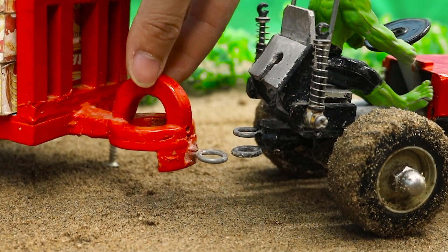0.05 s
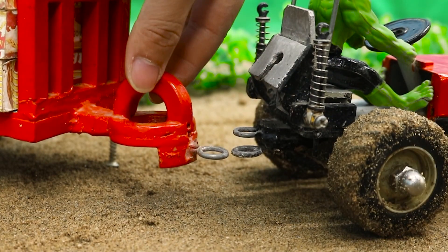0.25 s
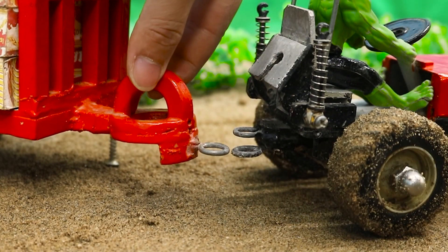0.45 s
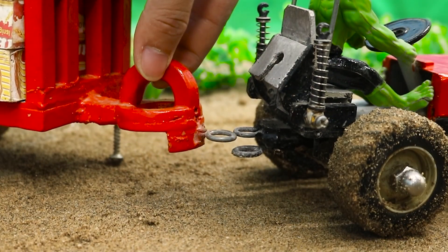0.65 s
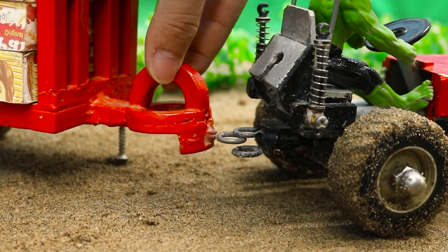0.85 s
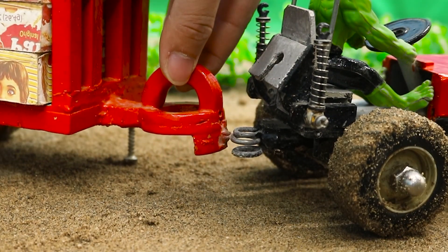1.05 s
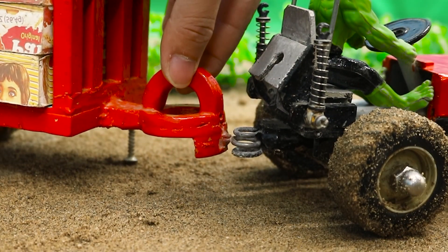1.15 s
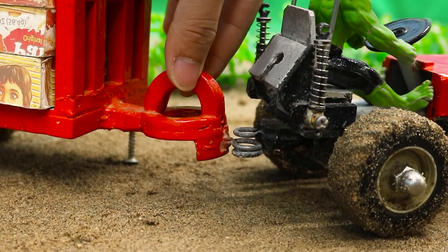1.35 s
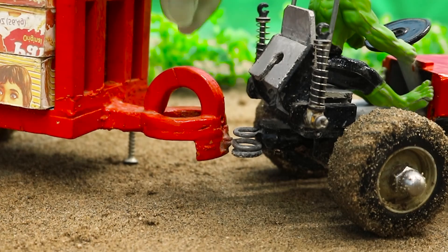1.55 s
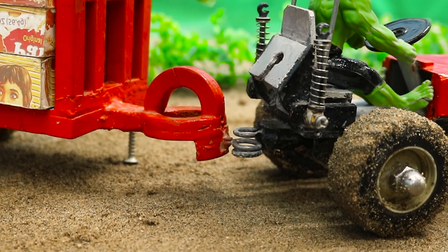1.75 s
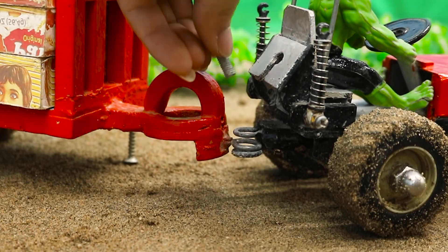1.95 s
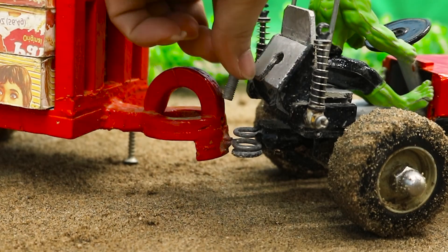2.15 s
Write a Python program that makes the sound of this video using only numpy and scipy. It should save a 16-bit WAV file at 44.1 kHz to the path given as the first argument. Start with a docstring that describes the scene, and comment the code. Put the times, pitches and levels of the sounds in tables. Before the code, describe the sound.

A toy trailer hitch knocks and scrapes onto a toy tractor, with faint birds behind.

```python
"""Small birds whistle and trill far off, over a steady low rumble and hum.
At 0.26 s comes one dull bump close to the microphone.
From 1 s a toy trailer's hitch is pushed onto a toy tractor's coupling: it touches, knocks home,
scrapes and settles. Each contact rings the frames and jingles a metal eyelet."""
import sys
import numpy as np
from scipy import signal
from scipy.fft import rfft, irfft, next_fast_len
from scipy.io import wavfile
from scipy.ndimage import map_coordinates

SR = 44100
rng = np.random.default_rng(int(sys.argv[2]) if len(sys.argv) > 2 else 0)


def bounce(signal):
    """Save signal as a 16-bit WAV file at the path given by the first command-line argument."""
    frames = np.transpose(np.atleast_2d(signal))
    limited = np.clip(frames, -1, 1)
    pcm = np.round(limited * 32767).astype(np.int16)
    wavfile.write(sys.argv[1], SR, pcm)


N = 97020


def amp(db):
    return 10 ** (np.asarray(db) / 20)


def unit(x):
    return x / np.sqrt(np.mean(x ** 2) + 1e-20)


def clock(start_s=0):
    """Seconds since start_s, per sample."""
    return np.arange(N) / SR - start_s


def along(points, hz):
    """Interpolate (Hz, value) points on a log frequency axis."""
    knots_hz, values = np.transpose(points)
    return np.interp(np.log(hz + 1), np.log(knots_hz + 1), values)


def pan(db):
    """Left and right gains; positive is left."""
    return amp(np.array([[db], [-db]]) / 2)


def wobble(knots_per_s):
    """Smooth random curve."""
    return map_coordinates(rng.standard_normal(N // 8), [clock() * knots_per_s], mode="wrap")


def filtered(x, response):
    """Apply the gain response(hz)."""
    size = next_fast_len(N + SR // 2)
    return irfft(rfft(x, size) * response(np.fft.rfftfreq(size, 1 / SR)), size)[..., :N]


def noise(spectrum, tilt_db_oct=0):
    """Coloured noise of rms 1, tilted above about 500 Hz."""
    white = rng.standard_normal(N)
    return unit(filtered(white, lambda hz: amp(along(spectrum, hz) + tilt_db_oct * np.log2(1 + hz / 500))))


def dying(x, t60s):
    """Decay each frequency of x at its own rate."""
    hz, t, bins = signal.stft(x, SR, nperseg=256)
    decay = amp(-60 * t / along(t60s, hz)[:, None])
    return signal.istft(bins * decay, SR, nperseg=256)[1][..., :N]


def fade(start_s, t60_s):
    """Sudden start, exponential decay."""
    t = clock(start_s)
    return (t >= 0) * amp(-60 * abs(t) / t60_s)


def swell(peak_s, rise_s, fall_s):
    """Gaussian rise and fall."""
    t = clock(peak_s)
    return np.exp(-(t / np.where(t < 0, rise_s, fall_s)) ** 2 / 2)


def sine(hz, start_s=0, phase_rad=0):
    return np.sin(2 * np.pi * hz * clock(start_s) + phase_rad)


def ring(modes, start_s, scatter_db):
    """Damped modes of alternating sign, struck a little differently each time."""
    return sum(-(-1) ** k * amp(db + scatter_db * rng.normal()) * fade(start_s, t60_s) * sine(hz, start_s)
               for k, (hz, db, t60_s) in enumerate(modes))


def echo(x, t60s):
    """Convolve with a diffuse tail of energy 1."""
    tail = dying(rng.standard_normal(N), t60s)
    return signal.fftconvolve(x, tail / np.linalg.norm(tail))[:N]


def rumble():
    """Low rumble and faint hiss, wider in the treble."""
    # Each row: frequency in Hz, relative density in dB.
    spectrum = [(12, -54), (20, -48), (40, -2), (64, -3.5), (87, -8), (126, -7.5), (148, -20.5),
                (175, -14.5), (306, -27), (427, -33), (597, -34), (1340, -44.5), (2150, -46.5),
                (3080, -50.5), (4070, -49), (4810, -54), (12000, -67), (13500, -81), (15500, -88)]
    # Each row: frequency in Hz, left-right correlation.
    correlation = [(60, 1), (180, 0.93), (550, 0.71), (1650, 0.6), (4970, -0.06), (15000, 0.36)]
    # Each row: frequency in Hz, left over right in dB.
    balance = [(60, -1.9), (180, -1.2), (550, 1.8), (1650, -1.5), (4970, 0.67), (15000, -0.5)]

    def mid_side_gains(hz):
        angle = np.arccos(along(correlation, hz)) / 2
        return np.array([np.cos(angle), np.sin(angle)])

    mid, side = filtered(np.array([noise(spectrum), noise(spectrum)]), mid_side_gains)
    air = np.array([mid + side, mid - side])
    air = filtered(air, lambda hz: amp(np.outer([.5, -.5], along(balance, hz))))
    return amp(-38.5) * unit(air)


def hum():
    """Low tones wavering in level and phase."""
    # Each row: frequency in Hz, rms level in dB.
    lines = [(59.2, -39), (118.4, -51.5), (260, -58), (303, -60), (465, -68), (605, -68)]
    waver_db, drift_rad = 1, 0.81
    tones = sum(amp(db + waver_db * wobble(8.04)) * sine(hz, phase_rad=drift_rad * wobble(8.09))
                for hz, db in lines)
    return np.sqrt(2) * tones * pan(1.5)


def whistles():
    """Short gliding bird notes, first on the right, the last few on the left."""
    # Each row: start in s, length in s, start and end of the glide in Hz, level in dB, pan in dB,
    # roughness as a share of the pitch.
    notes = [(-.03, 0.11, 1900, 1990, -54.5, -3, 0.0016), (0.019, .06, 3560, 3500, -66, -15, 0.0089),
             (0.11, 0.054, 3200, 2620, -66.5, -15, 0.031), (0.196, 0.051, 1907, 1930, -62, -10, 0.0036),
             (0.27, 0.037, 1870, 1837, -57.5, -10, .004), (0.295, 0.024, 3400, 2870, -60, -12, .015),
             (0.318, 0.033, 2710, 2500, -61, -16.5, 0.014), (0.323, 0.028, 4020, 3900, -67.5, -10, 0.021),
             (0.39, 0.018, 3250, 3570, -68.5, -4, .02), (0.404, 0.046, 2100, 2240, -65.5, -14, .015),
             (0.439, 0.089, 2560, 2430, -65.5, -7, 0.01), (0.536, 0.085, 2033, 1951, -64.5, -15, 0.0018),
             (0.662, 0.056, 3594, 3522, -62.5, -17.5, 0.0066),
             (0.78, 0.058, 3286, 3474, -55, -12.5, 0.0052), (0.812, 0.022, 2810, 2680, -61.5, -10, 0.027),
             (0.831, 0.037, 2160, 2235, -61, -18, 0.0099), (0.876, 0.064, 2850, 2890, -66.5, -11, 0.014),
             (0.963, 0.056, 3350, 3090, -61, -11, 0.039), (1.569, 0.021, 2650, 2960, -67, 15, 0.033),
             (1.769, 0.034, 2710, 2670, -67.5, 14, 0.067), (1.95, 0.027, 2580, 2800, -65.5, 17, 0.055)]
    sag_hz = 39.9
    out = np.zeros((2, N))
    for start_s, length_s, from_hz, to_hz, db, pan_db, roughness in notes:
        progress = np.clip(clock(start_s) / length_s, 0, 1)
        arch = abs(np.sin(np.pi * progress))
        hz = from_hz + (to_hz - from_hz) * progress - sag_hz * (arch - .5)
        hz *= 1 + roughness * wobble(400)
        out += amp(db) * arch * np.sin(2 * np.pi * np.cumsum(hz) / SR) * pan(pan_db)
    return out


def rubs():
    """Soft rubbing around the bump."""
    # Each row: frequency in Hz, relative density in dB.
    spectrum = [(100, -3), (400, -2), (1000, -4.5), (2500, -16.5), (5000, -25), (11000, -33.5),
                (16000, -48)]
    # Each row: peak time in s, rise in s, fall in s, level in dB, tilt in dB per octave.
    strokes = [(0.2342, 0.0011, 0.024, -39, -1.5), (0.272, 0.027, 0.017, -50, 1),
               (0.28, 0.033, 0.021, -52, 4.5)]
    out = np.zeros((2, N))
    for peak_s, rise_s, fall_s, db, tilt in strokes:
        friction = np.array([noise(spectrum, tilt), noise(spectrum, tilt)])
        out += amp(db) * swell(peak_s, rise_s, fall_s) * friction
    return out


def air_push():
    """The bump's push of air and its rebound."""
    # Each row: centre in s, width in s, level in dB.
    pulses = [(0.2518, 0.0047, -13), (0.279, 0.014, -21.5)]
    out = np.zeros(N)
    for centre_s, width_s, db in pulses:
        u = clock(centre_s) / width_s
        out += amp(db) * (1 - u * u) * np.exp(-u * u / 2)
    return out


def microphone_rock(start_s):
    """The bump rocks the microphone, its two sides in opposition."""
    # Each row: frequency in Hz, level in dB, t60 in s.
    modes = [(30, -19, 0.21), (86, -13.5, 0.11)]
    rock = sum(amp(db) * fade(start_s, t60_s) * sine(hz, start_s) for hz, db, t60_s in modes)
    return np.array([-rock, rock])


def knock(start_s):
    """The bump's dull knock: damped modes, a brief crack and a low thud."""
    # Each row: frequency in Hz, relative level in dB, t60 in s.
    modes = [(131, -12, .07), (230.3, 0, 0.12), (371, -9, 0.098), (655, -14, 0.062), (772, -10.5, 0.06),
             (920, -21, 0.04), (1140, -10.5, 0.046), (1270, -24, 0.087)]
    # Each row of both: frequency in Hz, relative density in dB.
    crack_spectrum = [(100, 12), (500, 10), (1200, -24), (2500, -4.5), (5000, -17.5), (12000, -25),
                      (16000, -38)]
    thud_spectrum = [(15, -10), (35, 11), (70, 0), (140, 0.5), (300, -6), (700, -33), (2000, -52),
                     (8000, -62)]
    rise_s, fall_s = 0.017, 0.023
    body = amp(-19) * ring(modes, start_s, scatter_db=1)
    crack = amp(-24.5) * fade(start_s, t60_s=0.033) * noise(crack_spectrum)
    t = clock(start_s)
    envelope = np.exp(-abs(t) / np.where(t < 0, rise_s, fall_s))
    thud = amp(-24) * envelope * np.array([noise(thud_spectrum), noise(thud_spectrum)])
    return (body + crack) * pan(0.5) + thud


def pressure_dips():
    """Sharp pressure dips of the knock and its rebound."""
    # Each row: time in s, level in dB.
    dips = [(0.2578, -8.5), (.2645, -25)]
    width_s, tip_round_s = 0.00039, 0.00005
    pulses = sum(amp(db) * np.exp(-np.hypot(clock(at_s), tip_round_s) / width_s) for at_s, db in dips)
    return -pulses * pan(0.5)


def trills():
    """Bird notes on the left, mostly rising, warbling fast in pitch and level."""
    # Each row: start in s, length in s, pitch in Hz, rise in Hz per s, level in dB, relative warble.
    notes = [(0.505, 0.079, 3950, 0, -74, 0.54), (0.676, 0.13, 4120, 297, -68, .5),
             (0.87, 0.11, 4050, 191, -68, 0.68), (1.434, 0.12, 4040, 203.5, -68.5, .4),
             (1.628, .108, 4140, 1503, -66, 0.96), (1.814, 0.12, 4020, 1604, -62.5, 0.86),
             (2, .093, 4000, 3410, -60.5, 0.96)]
    warble_hz, swing_hz = 65.4, 145
    out = np.zeros(N)
    for start_s, length_s, pitch_hz, rise_hz_s, db, warble in notes:
        t = np.clip(clock(start_s), 0, length_s)
        beat = 2 * np.pi * warble_hz * t
        swing = warble * np.sin(beat) + 0.34 * wobble(280)
        hz = pitch_hz + rise_hz_s * (t - length_s / 2) + swing_hz * swing
        arch = abs(np.sin(np.pi * t / length_s)) ** .5
        tremolo = 1 - 0.8 * warble * np.cos(beat)
        out += amp(db) * arch * tremolo * np.sin(2 * np.pi * np.cumsum(hz) / SR)
    return out * pan(14.5)


def birds():
    """Distant whistles and trills with a short echo."""
    # Each row: frequency in Hz, t60 in s.
    echo_t60s = [(2000, 0.26), (5000, 0.073)]
    song = whistles() + trills()
    return song + amp(-7) * np.array([echo(side, echo_t60s) for side in song])


def frame_ring(start_s):
    """The struck toy frames ring in their modes."""
    # Each row: frequency in Hz, relative level in dB, t60 in s.
    modes = [(167.4, -3, 1.82), (220.5, -11.5, 1.56), (288, -4.5, 1), (326.6, -9, 0.94), (401, -6, 0.25),
             (433, -0.5, 0.31), (490, -11, 0.45), (534, 0, 0.52), (604, -2.5, 0.5), (750, -7, 0.6),
             (769, -14, 0.67), (970, -24, 0.45), (1134, -16, 0.76), (1258, -10.5, 1.03), (1490, -0.5, 0.35),
             (1760, 2, 0.32), (1803, -6.5, 0.3), (1917, -9, 0.81), (2305, -11, 0.41), (2614, -9, 0.29),
             (2950, -17, 0.41)]
    attack_s = 0.004
    onset = 1 - np.exp(-abs(clock(start_s)) / attack_s)
    return amp(-6.5) * onset * ring(modes, start_s, scatter_db=2)


def eyelet_jingle(start_s):
    """The metal eyelet's modes, blurred by its rattling."""
    # Each row: frequency in Hz, relative level in dB, t60 in s.
    modes = [(3560, -8, 0.11), (5440, -12, 0.17), (7180, 2.5, 0.15), (8020, -2, 0.26), (8770, -7, .2),
             (9020, -7, .18), (11100, -15, .14)]
    blur_rad, rattle_per_s = 1.2, 410
    return sum(amp(db) * fade(start_s, t60_s) * sine(hz, start_s, blur_rad * wobble(rattle_per_s))
               for hz, db, t60_s in modes)


def hitch_contacts():
    """Each contact ticks, clatters and excites frames and eyelet; only its treble is wide."""
    # Each row: start in s, level in dB, clatter tilt in dB per octave, ring and jingle gains in dB.
    hits = [(1.021, -42.5, 1.5, -3, -16), (1.0825, -27.5, 0, 2, -19), (1.284, -42.5, 1, -0.5, -12)]
    # Each row of both: frequency in Hz, relative density in dB.
    spectrum = [(40, -7), (110, 5), (280, -1.5), (550, 0), (950, -10.5), (1350, -16), (1800, -2.5),
                (2400, -18), (3200, -9.5), (4800, -21), (7300, -27), (11000, -26), (15500, -40)]
    side_spectrum = [(100, -50), (2500, -56), (4000, 2), (5500, -3), (7500, -1), (10000, -31), (13000, -10),
                     (16000, -26)]
    # Each row: frequency in Hz, t60 in s.
    clatter_t60s = [(100, 0.91), (300, 0.74), (700, 0.57), (1800, 0.43), (4800, 0.17), (8000, 0.15),
                    (14000, 0.23)]
    out = np.zeros((2, N))
    for start_s, db, tilt, ring_db, jingle_db in hits:
        clatter = dying(noise(spectrum, tilt), clatter_t60s)
        clatter = np.pad(clatter, (round(start_s * SR), 0))[:N]
        tick = amp(-4) * fade(start_s, t60_s=0.022) * noise(spectrum, tilt_db_oct=-1.5)
        frames = amp(ring_db) * frame_ring(start_s)
        jingle = amp(jingle_db) * eyelet_jingle(start_s)
        side = amp(-14) * fade(start_s, t60_s=0.14) * noise(side_spectrum)
        out += amp(db) * (clatter + tick + frames + jingle + np.array([side, -side]))
    return out


def hitch_scrapes():
    """The hitch slides in fine, uneven slips, with a lingering tail."""
    # Each row: peak time in s, rise in s, fall in s, level in dB, tilt in dB per octave.
    slides = [(1.035, 0.016, 0.014, -32.5, -4.5), (1.117, 0.023, 0.048, -33, -2),
              (1.145, 0.017, 0.025, -32, 2.5), (1.181, 0.006, 0.032, -39, 0.9),
              (1.301, 0.0097, 0.024, -39, 1.2)]
    # Each row: frequency in Hz, relative density in dB.
    spectrum = [(40, -1), (150, 1), (290, 1.5), (480, 4), (680, -3.5), (950, -7.5), (1200, -5),
                (1400, -9.5), (1800, -8), (2400, -12), (3200, -15), (4500, -20.5), (7000, -22.5),
                (9000, -31), (15500, -44.5)]
    # Each row: frequency in Hz, t60 in s.
    echo_t60s = [(150, 0.35), (700, 0.81), (2000, 0.51), (5000, 0.39), (13000, 0.15)]
    slips_per_s, slip_db = 700, 1
    out = np.zeros(N)
    for peak_s, rise_s, fall_s, db, tilt in slides:
        friction = unit(noise(spectrum, tilt) * amp(slip_db * wobble(slips_per_s)))
        out += amp(db) * swell(peak_s, rise_s, fall_s) * friction
    return out + amp(-5) * echo(out, echo_t60s)


def scene():
    """Hitch and bump in the centre, birds and rumble around them."""
    hitch = hitch_contacts() + hitch_scrapes()
    bump = knock(start_s=0.2582) + pressure_dips() + rubs() + air_push() + microphone_rock(start_s=0.255)
    return hitch + bump + birds() + rumble() + hum()


def record(dry):
    """Brick-wall low-pass."""
    top_hz = 15800
    return filtered(dry, lambda hz: hz < top_hz)


dry = scene()
out = record(dry)
bounce(out)
```